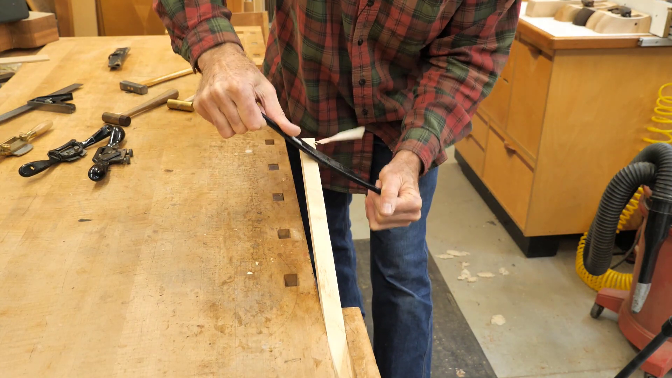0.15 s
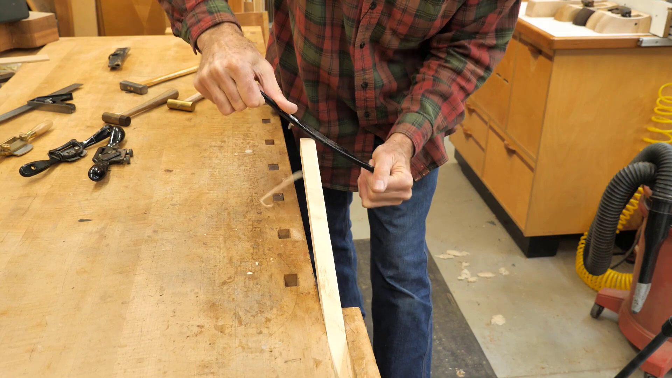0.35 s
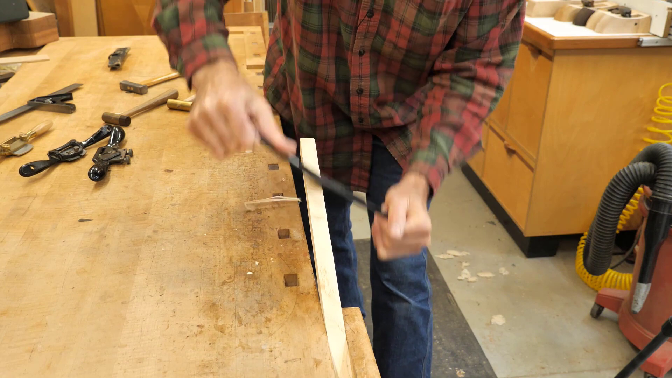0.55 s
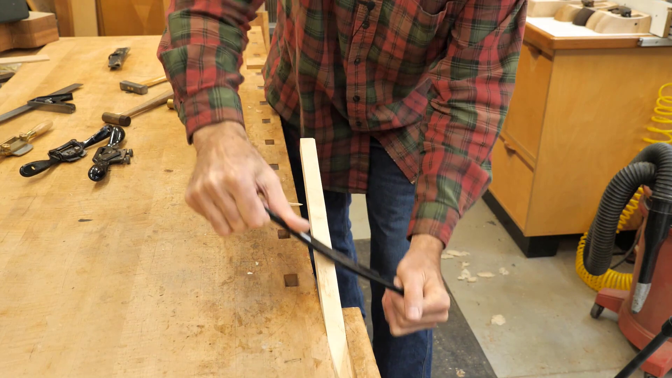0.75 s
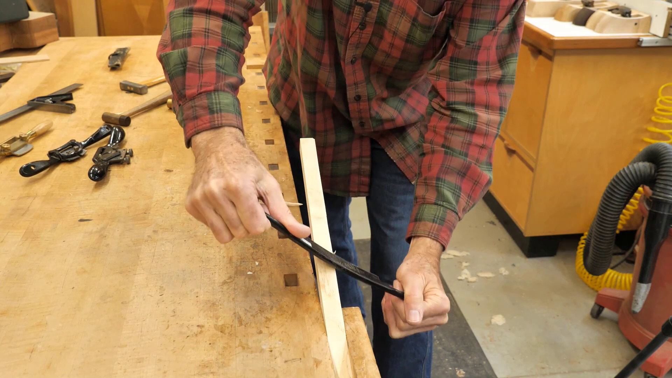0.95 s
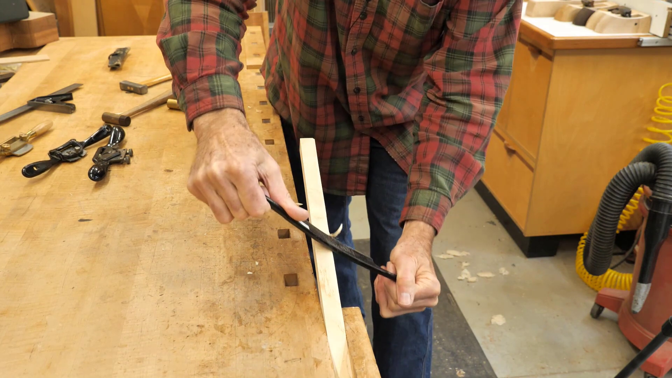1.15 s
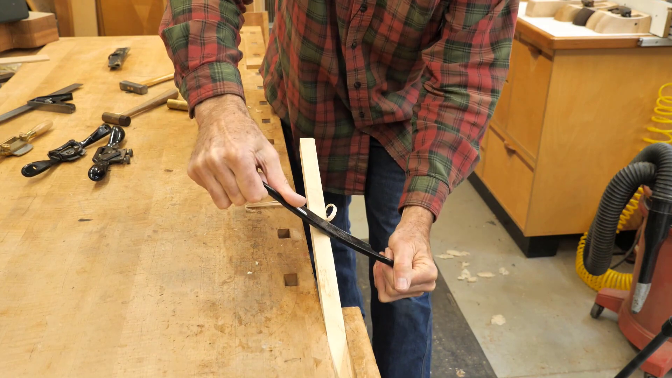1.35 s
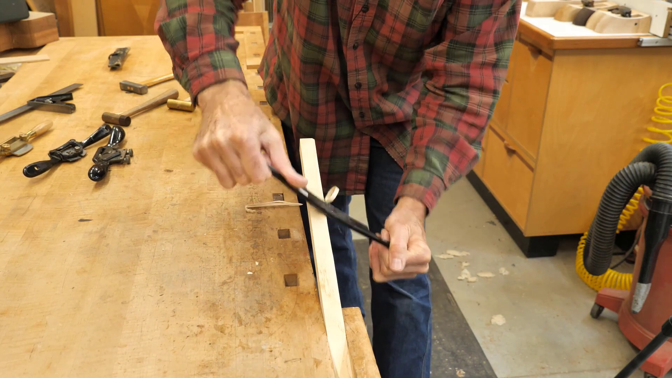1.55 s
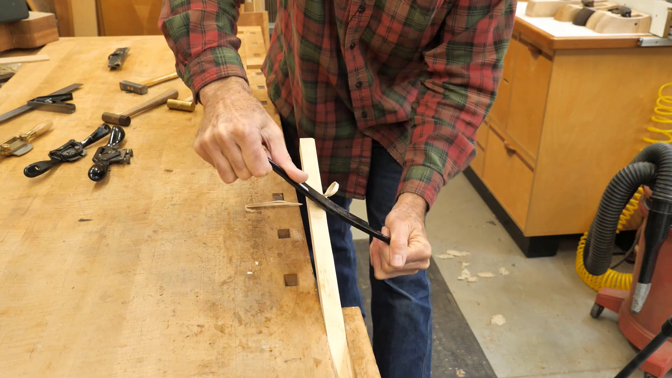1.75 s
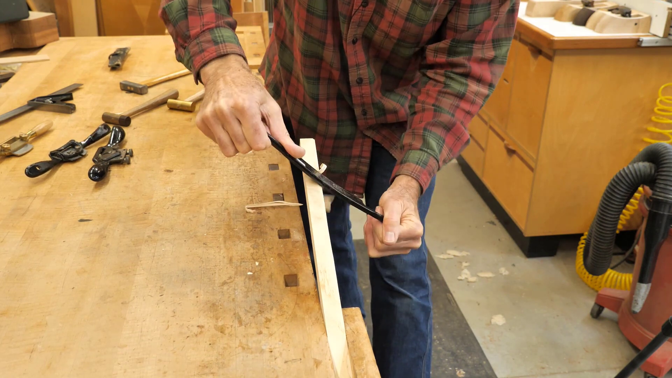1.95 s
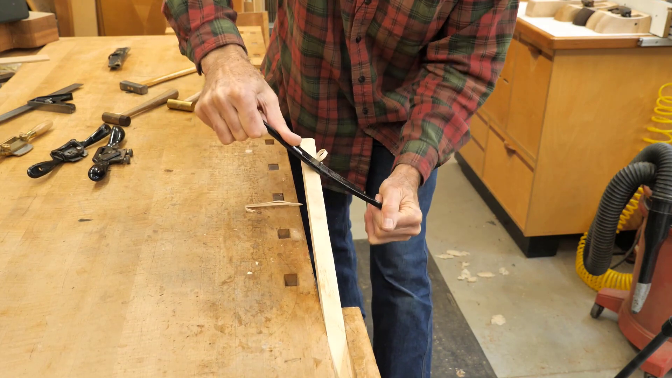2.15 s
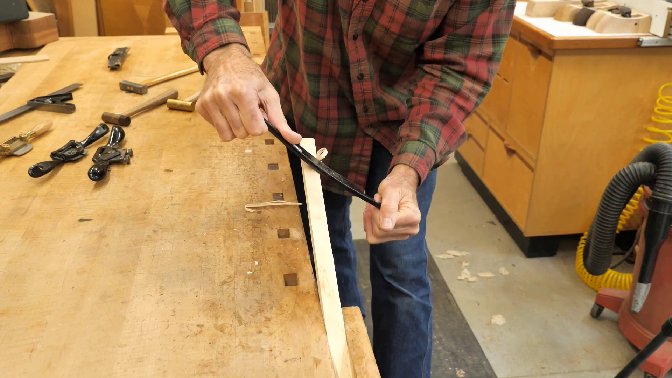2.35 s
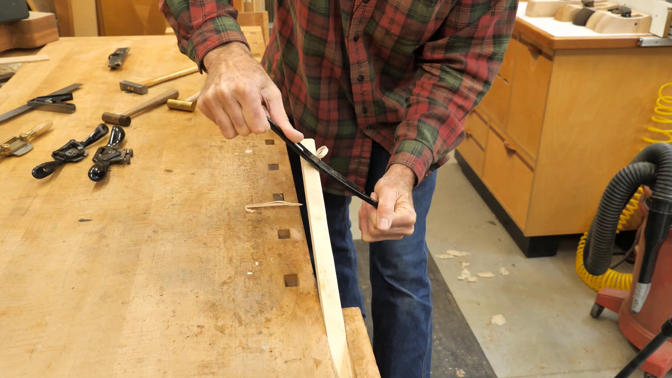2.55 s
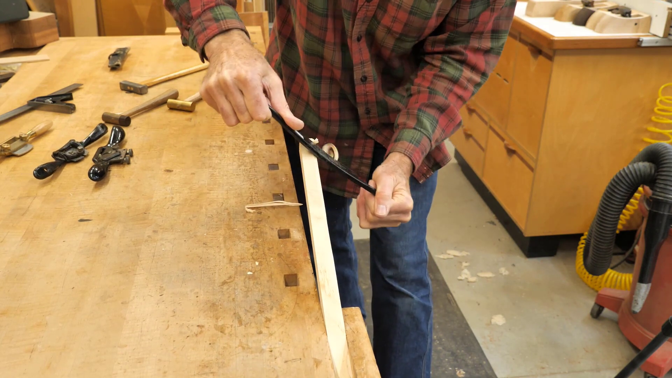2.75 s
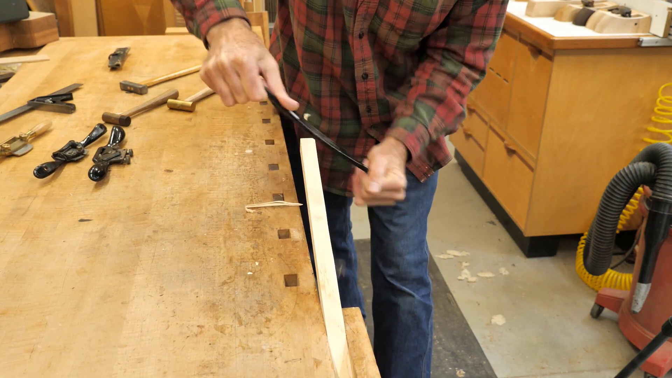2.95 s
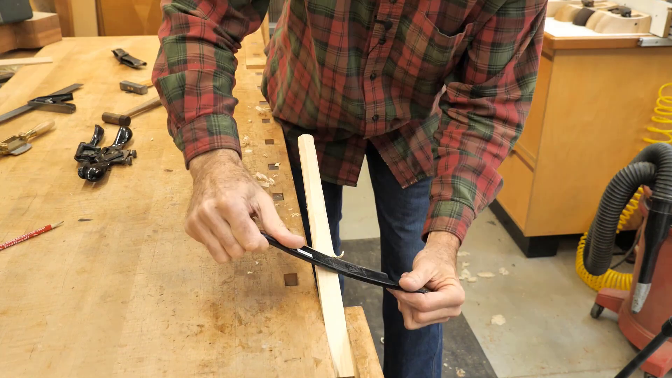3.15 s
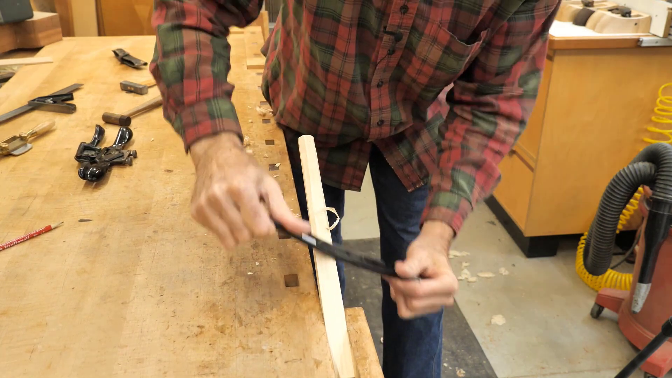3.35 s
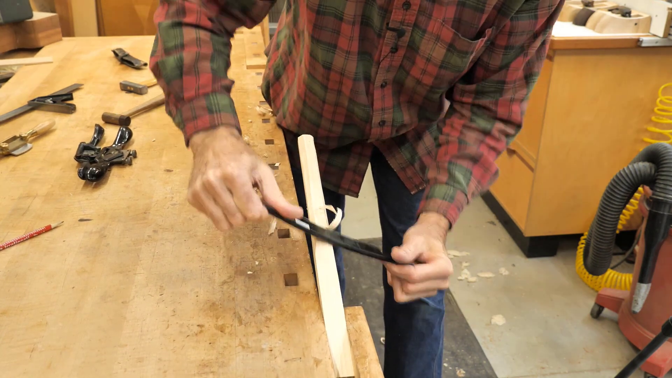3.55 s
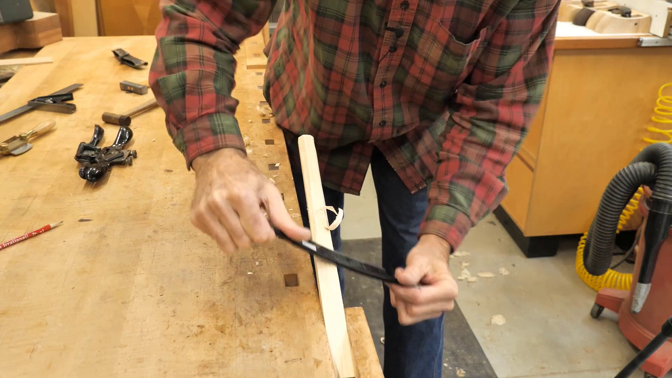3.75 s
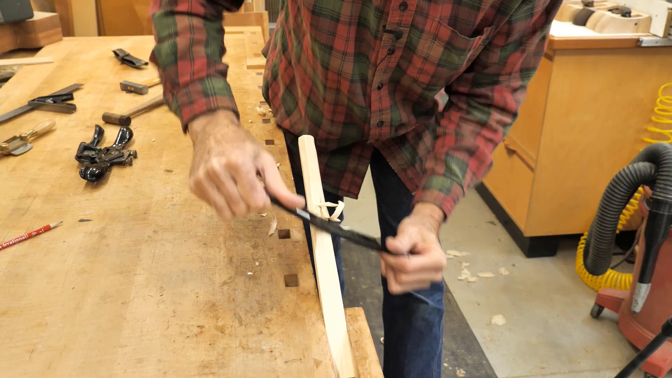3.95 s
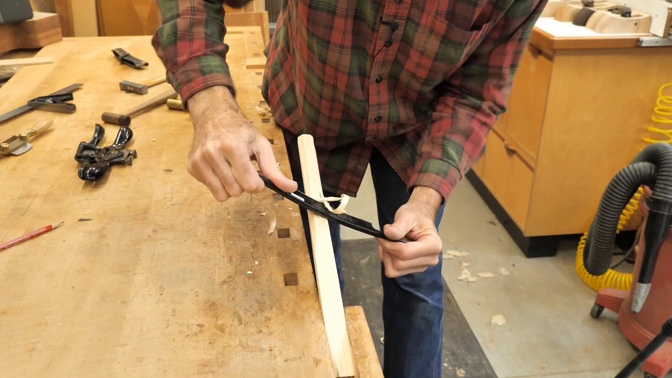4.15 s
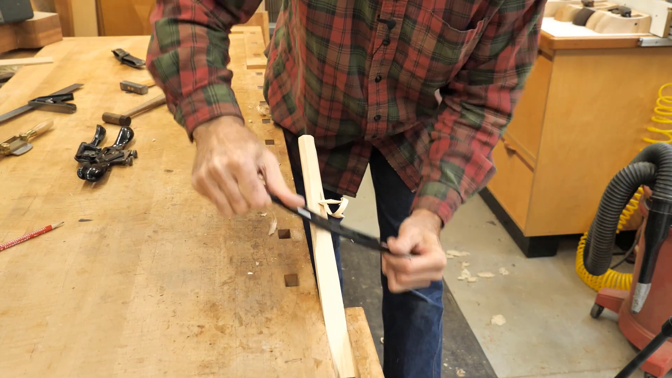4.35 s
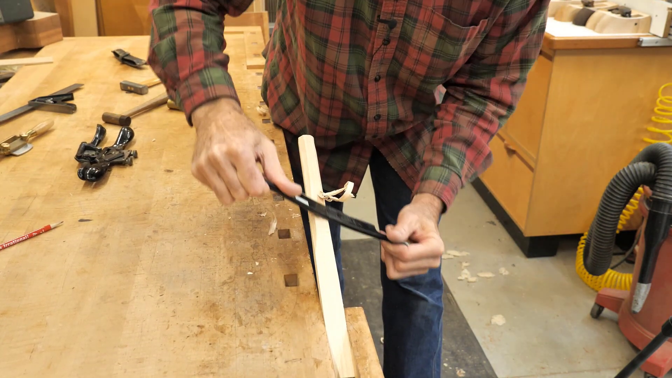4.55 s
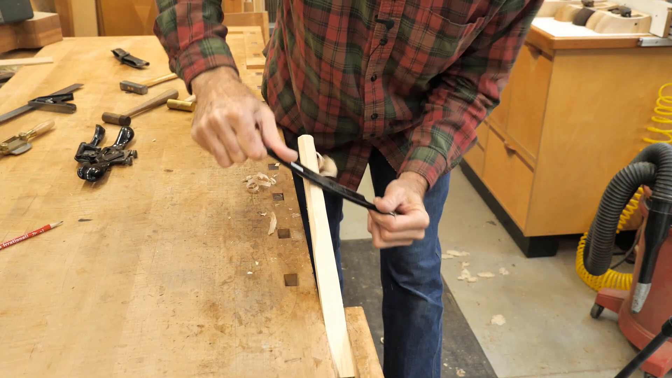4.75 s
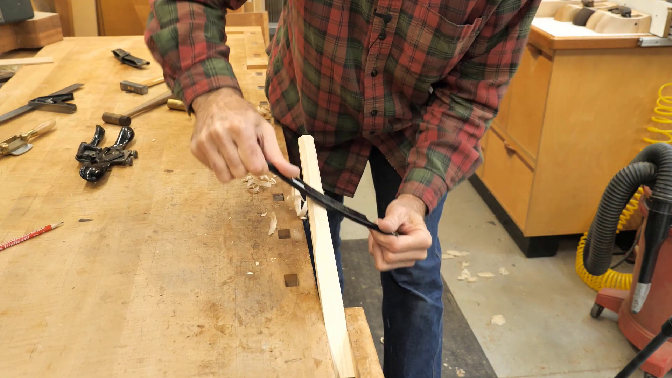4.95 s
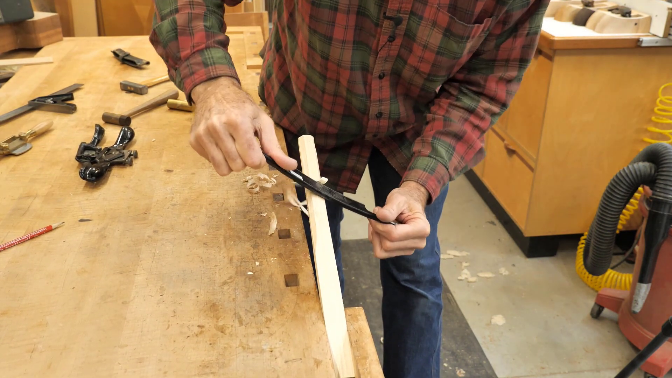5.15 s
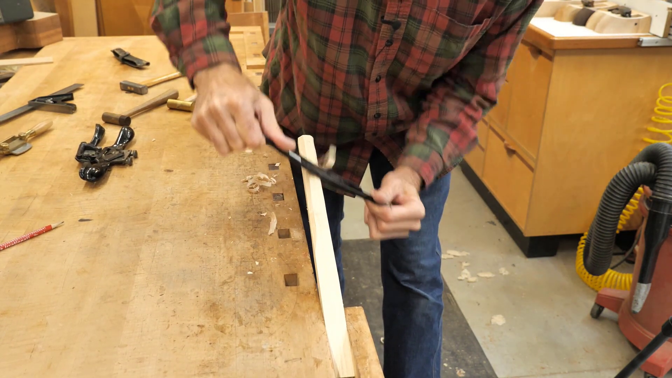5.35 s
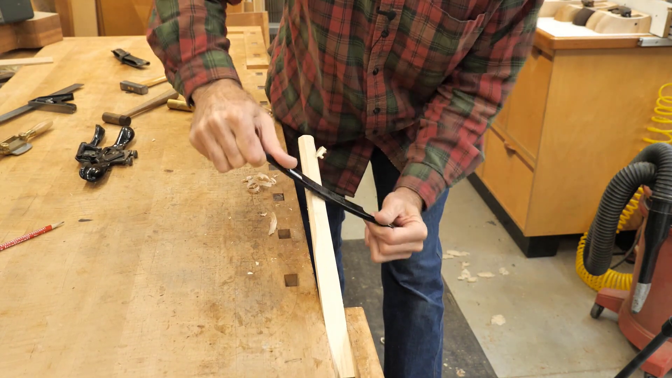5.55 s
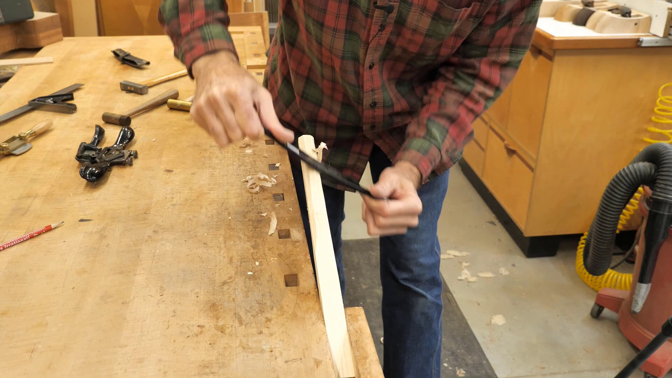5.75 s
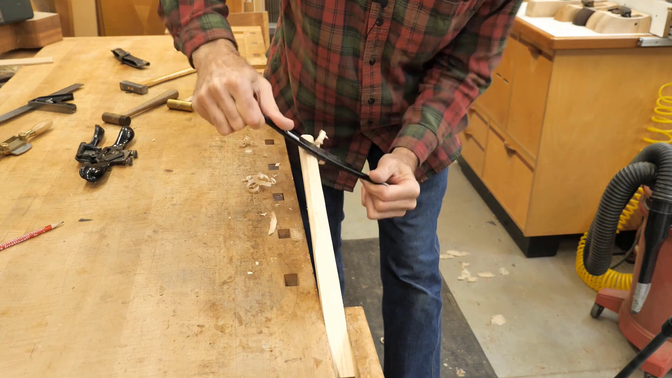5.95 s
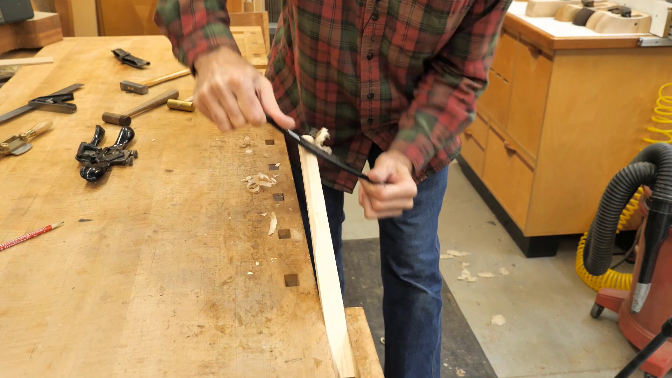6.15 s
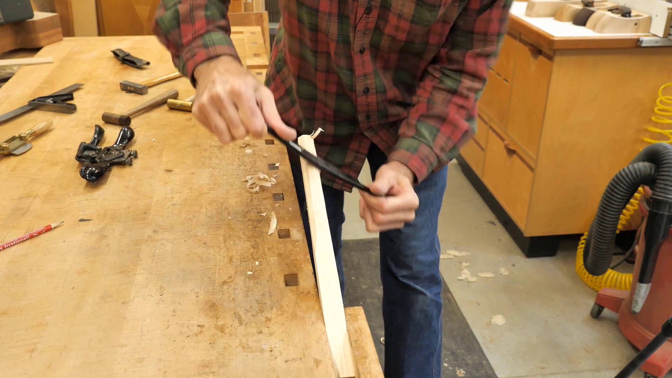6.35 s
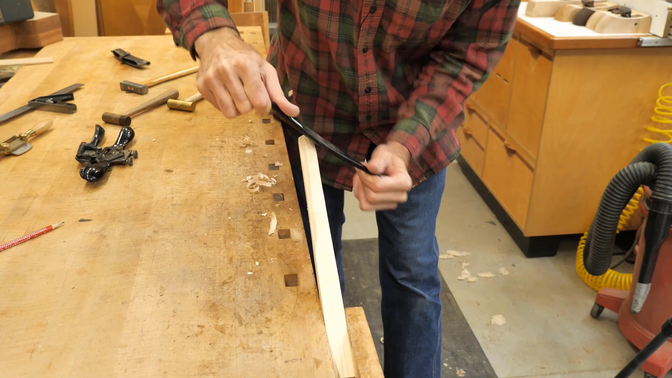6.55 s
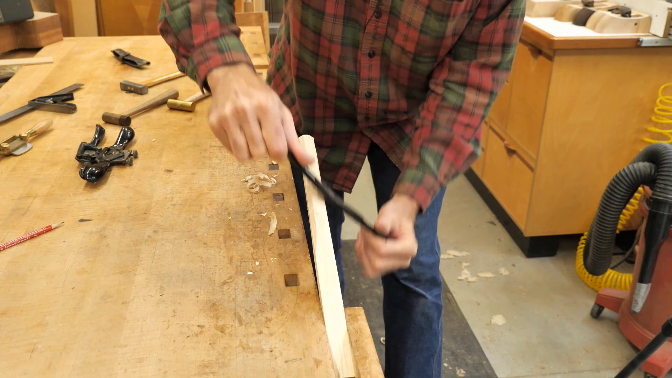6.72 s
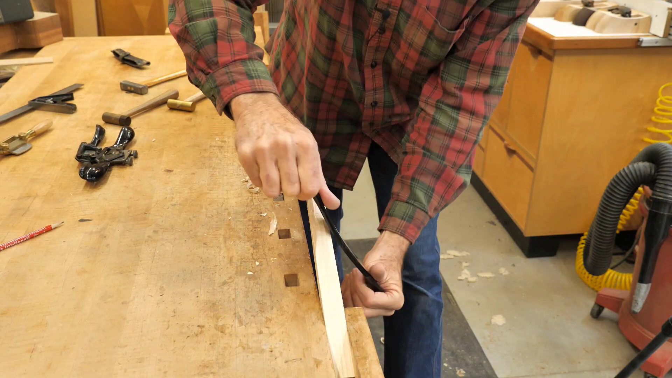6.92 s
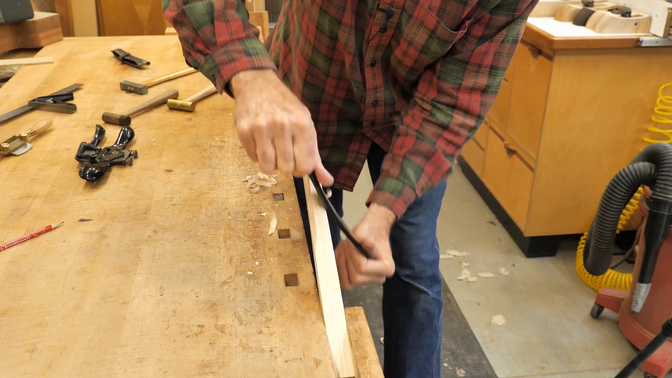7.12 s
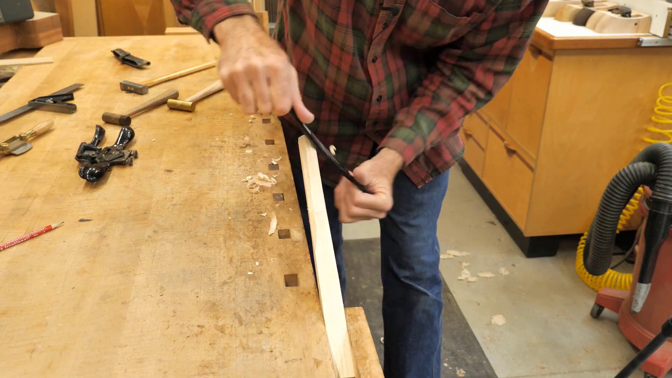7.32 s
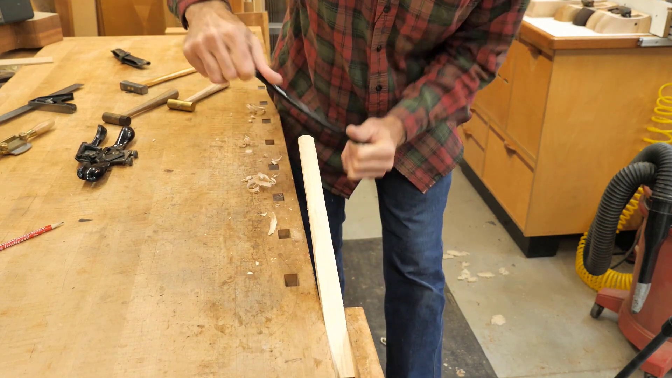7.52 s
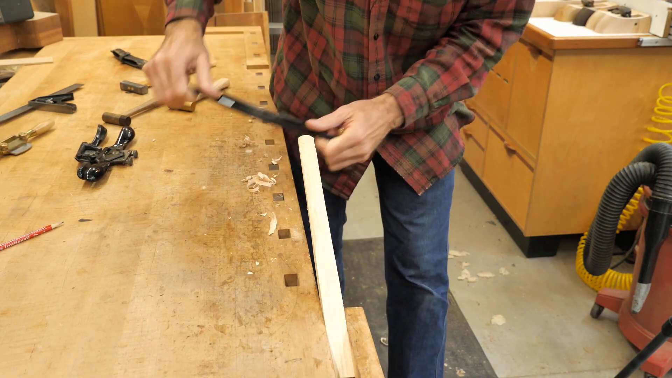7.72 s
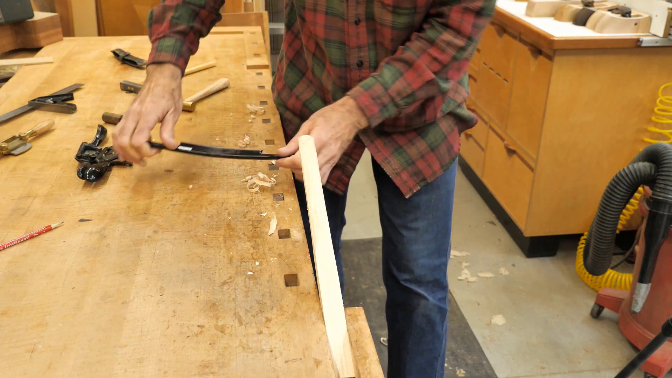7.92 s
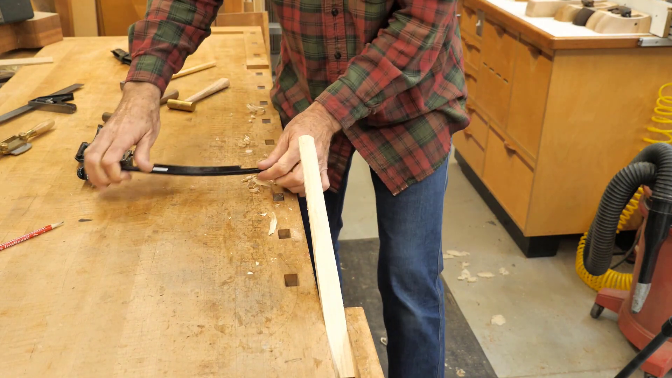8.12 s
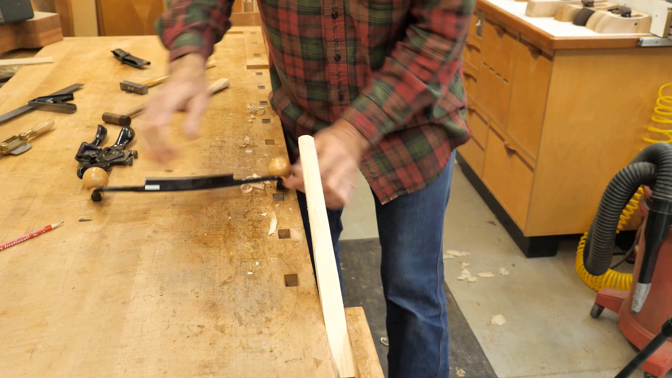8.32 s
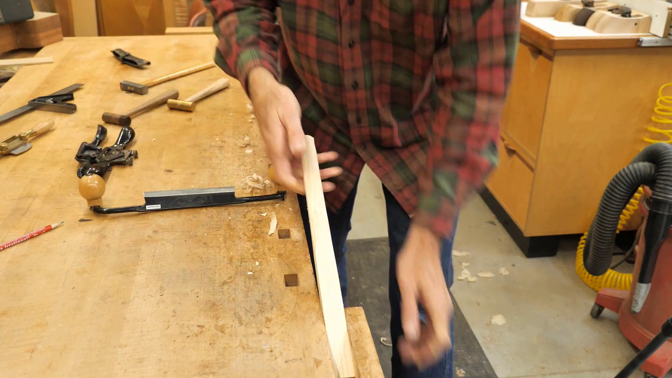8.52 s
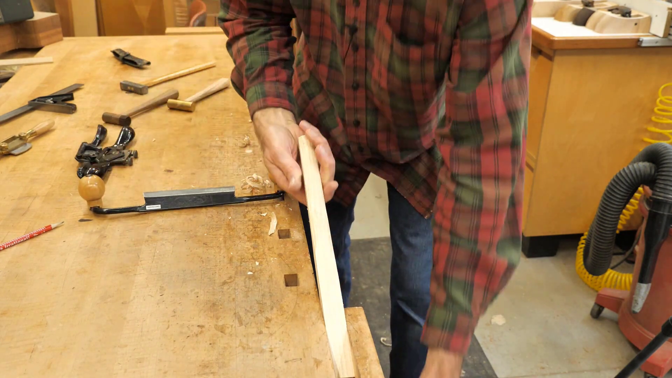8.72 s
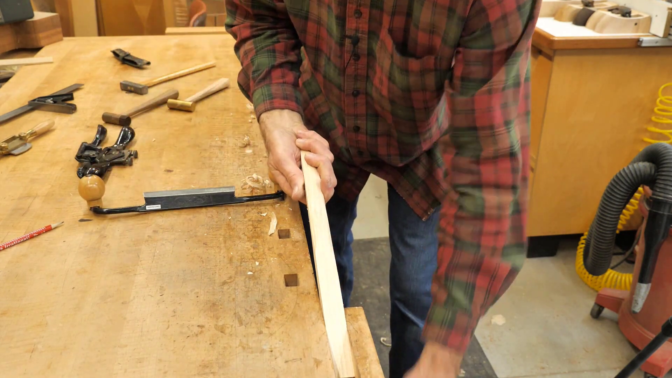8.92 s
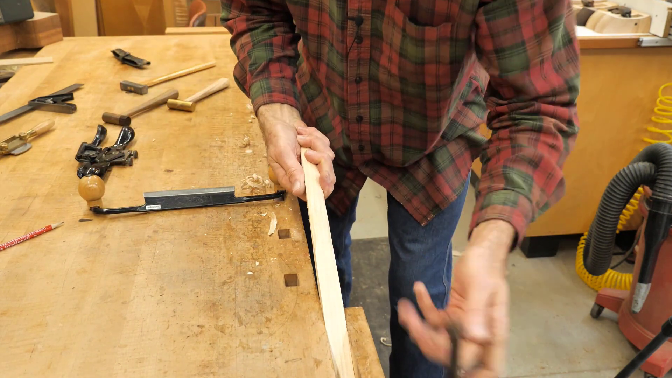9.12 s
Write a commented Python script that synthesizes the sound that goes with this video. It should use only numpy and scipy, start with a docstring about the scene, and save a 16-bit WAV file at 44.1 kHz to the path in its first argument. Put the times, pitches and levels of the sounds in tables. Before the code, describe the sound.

A drawknife pares a clamped wooden blank in short rasping, crackling strokes that grow louder, then it clatters onto the bench and a vise clanks.

```python
"""A drawknife pares a wooden blank in a bench vise: filtered random fractures rasp, fizz and drone.
Noise and a low resonance make the bench shudder; splinters snap as short bursts of noise.
Blade strikes send falling bending waves through the blank and ring its modes.
At last the knife is dropped rattling on the bench top and the vise clanks, as damped sines and noise.
Still air, a hiss that rises near the end and workshop echoes surround it at one close microphone."""
import sys
import numpy as np
from scipy import signal
from scipy.fft import rfft, irfft, next_fast_len
from scipy.io import wavfile
from scipy.ndimage import uniform_filter1d

SR = 44100
rng = np.random.default_rng(int(sys.argv[2]) if len(sys.argv) > 2 else 0)


def master(y):
    """Save y as 16-bit WAV."""
    cut = np.clip(np.atleast_2d(y).T, -1, 1)
    pcm = np.round(cut * 32767)  # scale
    wavfile.write(sys.argv[1], SR, pcm.astype(np.int16))


N = 404838
TIME = np.arange(N) / SR

# pulls of the knife: start t/s, time to bite t/s, time in the cut t/s, then relative levels:
# rasp of fibres level/dB, fizz of the shaving level/dB, drone of the blank level/dB, shudder of the bench level/dB
PULLS = [(0.019, 0.037, 0.045, -45, -56.5, -53, -45.5), (0.257, 0.071, 0.0067, -31.5, -49.5, -33.5, -39),
         (.64, 0.0069, 0.035, -54, -59, -36, -40), (.77, 0.011, 0.065, -52, -83, -48, -41.5),
         (.97, 0.096, 0.091, -46, -62, -44, -45.5), (1.13, 0.053, 0.22, -45, -58, -40.5, -45),
         (1.537, 0.013, 0.11, -37.5, -52.5, -35.5, -37), (1.8, 0.087, 0.054, -39.5, -48.5, -41, -40),
         (2.124, 0.031, 0.054, -40, -53.5, -42.5, -42.5), (2.381, 0.016, 0.07, -49.5, -51.5, -49, -48.5),
         (2.662, 0.049, 0.074, -38, -50.5, -37.5, -41), (2.946, 0.013, 0.0068, -39, -52, -34, -46),
         (3.105, .016, 0.072, -38.5, -47.5, -28, -35), (3.218, 0.046, 0.052, -32, -38.5, -24, -37),
         (3.528, 0.029, 0.066, -31.5, -37, -20.5, -49), (3.68, .03, 0.02, -59.5, -55, -37, -58),
         (3.801, 0.083, 0.028, -22.5, -39, -25.5, -27), (4.138, .035, 0.0084, -21, -32, -22.5, -24.5),
         (4.28, 0.021, 0.018, -45, -39, -29.5, -27.5), (4.345, 0.016, 0.0075, -37, -37.5, -38, -43),
         (4.448, 0.012, 0.028, -36, -35, -26.5, -28), (4.57, 0.022, 0.017, -41.5, -40.5, -37, -36),
         (4.635, 0.021, 0.014, -37, -37.5, -38, -53), (4.718, 0.025, 0.035, -25, -35, -30, -28),
         (4.871, 0.024, 0.0067, -117, -78, -31.5, -55), (5.001, 0.025, 0.083, -35.5, -52, -35.5, -38.5),
         (5.169, 0.013, 0.044, -68, -64, -35.5, -53), (5.363, 0.013, 0.058, -29.5, -39, -24.5, -32.5),
         (5.631, 0.037, 0.071, -25.5, -38.5, -26.5, -30), (5.912, 0.063, 0.0092, -22.5, -35, -23.5, -26.5),
         (6.15, 0.093, 0.0068, -25, -30, -24.5, -28), (6.33, 0.044, 0.015, -74, -107, -41, -43),
         (6.411, 0.04, 0.048, -27.5, -48, -34.5, -36), (6.775, 0.013, 0.0041, -43, -46, -38, -46),
         (6.811, .02, 0.039, -56, -63, -45, -40.5), (7.058, .09, 0.095, -38.5, -53.5, -38.5, -40),
         (7.28, 0.019, 0.055, -73, -65, -41, -41), (7.504, 0.0087, 0.022, -43, -54, -54, -44),
         (7.805, 0.011, 0.01, -52, -54, -71, -70)]
# spectrum of tearing fibres in a deep cut: f/Hz, level/dB
DEEP_RASP = [(800, -11.5), (1400, -2.5), (2200, -5.5), (3300, -1), (4900, -12.5), (5500, -23.5),
             (11000, -29)]
# spectra of a snapping splinter, its bright top and its lower crack: f/Hz, level/dB
SNAP_TOP = [(6000, -25.5), (10500, 4.5), (13000, 18), (15300, 21), (16500, -17)]
SNAP_CRACK = [(900, -51.5), (2500, 4), (4500, 24), (7500, 23), (10000, 20), (12500, 9), (16000, -20)]
# modes of the bench top: f/Hz, relative level/dB, t60 t/s
BENCH_MODES = [(96, -5, .34), (142, -7, .28), (339, -9, .16), (401, -1, .19), (505, -1, .16),
               (565, -1, .18), (642, -8, .16), (785, -5, .16), (828, -6, .2), (982, -6, .17),
               (1004, -6, .17), (1265, -5, .2), (1451, -5, .2), (1822, -10, .16)]


def amp(db):
    """Decibels to gain."""
    return 10 ** (np.asarray(db) / 20)


def evened(x):
    """Scales to rms 1."""
    return x / np.sqrt(np.mean(x ** 2) + 1e-20)


def peaked(x, size=176):
    """Scales a hit so that its loudest stretch of `size` samples (4 ms) has rms 1."""
    return x / np.sqrt(uniform_filter1d(x ** 2, size).max() + 1e-20)


def read(points, hz):
    """Reads a table along a logarithmic frequency axis."""
    f, value = np.transpose(points)
    return np.interp(np.log(hz + 1), np.log(f + 1), value)


def gains(rows):
    """One gain curve over time for each dB column of a table."""
    s, *columns = np.transpose(rows)
    return [amp(np.interp(TIME, s, c)) for c in columns]


def add(mix, s, sound):
    """Mixes a sound in at a time in seconds."""
    part = mix[max(round(s * SR), 0):][:len(sound)]
    part += sound[:len(part)]


def colour(x, spectrum, size=8192):
    """Causal minimum-phase filter with the given spectrum, falling 24 dB per octave beyond its ends."""
    hz = np.abs(np.fft.fftfreq(size, 1 / SR)) + 1
    octaves_out = np.abs(np.log2(hz / np.clip(hz, spectrum[0][0], spectrum[-1][0])))
    level_db = np.maximum(read(spectrum, hz) - 24 * octaves_out, -100)
    log_gain = np.log(amp(level_db))
    response = np.exp(np.conj(signal.hilbert(log_gain)))
    taps = np.fft.ifft(response).real[:size // 2]
    return signal.oaconvolve(x, taps)[:len(x)]


def ring(modes):
    """A struck object: a sum of dying sines."""
    t = TIME[:SR // 2]
    return sum(amp(db) * np.exp(-np.log(1000) * t / t60) * np.sin(2 * np.pi * hz * t)
               for hz, db, t60 in modes)


def dying(t60s):
    """Countless overlapping modes or echoes: noise whose bands each fade at their own speed."""
    hz, t, z = signal.stft(rng.standard_normal(SR // 2), SR, nperseg=256)
    decay = np.exp(-np.log(1000) * t / read(t60s, hz)[:, None])
    return signal.istft(z * decay, SR, nperseg=256)[1][:SR // 2]


def wander(hz):
    """Slow random drift with rms 1, rolling off above the given frequency."""
    size = next_fast_len(N)
    rolloff = 1 + (np.fft.rfftfreq(size, 1 / SR) / hz) ** 4
    return evened(irfft(rfft(rng.standard_normal(size)) / rolloff, size)[:N])


def fibres(per_s, spread_db):
    """Tiny fractures at random moments, of uneven strength and either sign."""
    size = amp(spread_db * np.minimum(rng.exponential(1, N), 4))
    return size * rng.choice([-1, 1], N) * (rng.random(N) < per_s / SR)


def resonate(x, hz, width):
    """Shifts hz (fixed or moving) down to zero, smooths, and shifts back: a resonance of gain 1."""
    turn = np.exp(2j * np.pi * np.cumsum(hz * np.ones(N)) / SR)
    r = np.exp(-np.pi * width / SR)
    return 2 * (turn * signal.lfilter([1 - r], [1, -r], x / turn)).real


def patchy(x, patch_db):
    """Uneven grain in the wood: narrow bands swell and fade for a few hundredths of a second."""
    z = signal.stft(x, SR, nperseg=512, noverlap=384)[2]
    across_bands = uniform_filter1d(rng.standard_normal(z.shape), size=4, axis=0)
    patches = evened(uniform_filter1d(across_bands, size=10, axis=1))
    return evened(signal.istft(z * amp(patch_db * patches), SR, nperseg=512, noverlap=384)[1][:N])


def background():
    """Still workshop air and a soft hiss that rises near the end, both filtered noise."""
    # spectrum of the air: f/Hz, level/dB
    air_spectrum = [(15, -44), (25, 1), (97, 1), (200, -10), (463, -7), (887, -23.5), (2840, -23),
                    (3620, -42.5), (13200, -32), (14800, -36), (16000, -71)]
    # spectrum of the hiss: f/Hz, level/dB
    hiss_spectrum = [(300, 1), (1200, -11), (1500, -12), (2800, -16), (4500, -8), (7000, -13.5),
                     (12700, -18), (16000, -26)]
    # rising hiss: t/s, level/dB
    hiss_levels = [(7.55, -72), (7.9, -53.5), (8.2, -50.5), (8.7, -53.5), (9.18, -53)]
    air, hiss = rng.standard_normal((2, N))
    still_air = amp(-55.5) * evened(colour(air, air_spectrum))
    return still_air + gains(hiss_levels)[0] * evened(colour(hiss, hiss_spectrum))


def pulls(levels_db, resting, swell, release, linger_db, linger):
    """Each pull swells as the edge bites, holds, and drops as it slips out into a slowly fading slide.

    release and linger are time constants in seconds.
    """
    out, t = resting.copy(), TIME[:SR]
    for (start, rise, hold, *_), db in zip(PULLS, levels_db):
        after = np.maximum(t - rise - hold, 0)
        slip = (1 - amp(linger_db)) * np.exp(-after / release)
        slide = amp(linger_db) * np.exp(-after / linger)
        add(out, start, amp(db) * np.minimum(t / rise, 1) ** swell * (slip + slide))
    return out


def rasping(level, grip):
    """Tearing fibres sound the blade and the shaving; a thicker shaving rasps louder and lower."""
    # spectrum of tearing fibres in a light cut: f/Hz, level/dB
    light_rasp = [(800, -14.5), (1400, -8.5), (2200, -7.5), (3000, -0.5), (3700, -7.5), (6000, -8),
                  (11000, -23.5)]
    # resonances of blade and shaving: f/Hz, width f/Hz, light cut level/dB, deep cut level/dB
    rasp_peaks = [(1373, 370, 3.5, -44), (1960, 48, -4, -2), (2210, 560, -23, 11), (2850, 63, -10.5, -4),
                  (3075, 32, -2, 9), (3630, 127, -9, 6.5), (4810, 280, -36, 19), (5840, 190, -5, -24)]
    # moving main resonance of the shavings: t/s, f/Hz
    shaving_pitch = [(.4, 1420), (1.05, 2660), (2.3, 2830), (2.7, 1320), (3.25, 2220), (3.87, 3560),
                     (4.2, 1740), (4.76, 1670), (5.05, 3270), (5.4, 2360), (6.44, 2400), (6.5, 1770),
                     (7.1, 2630)]
    tears = grip * fibres(per_s=4000, spread_db=3.4)
    light, deep = colour(tears, light_rasp), colour(tears, DEEP_RASP)
    light_ring, deep_ring = np.zeros((2, N))
    for hz, width, light_db, deep_db in rasp_peaks:
        mode = signal.iirpeak(hz, hz / width, fs=SR)
        light_ring += amp(light_db) * signal.lfilter(*mode, light)
        deep_ring += amp(deep_db) * signal.lfilter(*mode, deep)
    depth = level / (level + amp(-34))  # louder rasp crossfades to the deep cut
    edge = (1 - depth) * evened(light + light_ring) + depth * evened(deep + deep_ring)
    shaving_hz = np.interp(TIME, *np.transpose(shaving_pitch))
    edge = edge + amp(3) * resonate(edge, shaving_hz, width=280)
    return level * patchy(edge, patch_db=3.8)


def splinters(fizz, follow=0.67, top_db=-30, crack_db=-33):
    """Small splinters tick off at random, louder while a shaving curls."""
    ticks = fibres(per_s=60, spread_db=4)
    top = amp(top_db) * evened(colour(ticks, SNAP_TOP))
    crack = amp(crack_db) * evened(colour(ticks, SNAP_CRACK))
    return fizz ** follow * (top + crack)


def cutting():
    """The edge catches and slips; breaking fibres rasp, fizz and shake the blank and the bench."""
    # how hard the worker bears on the blank, keeping it trembling between pulls: t/s, relative level/dB
    lean_levels = [(0, -28), (2.55, -11.5), (3.1, -1.5), (3.35, 5), (4.4, 7.5), (5.45, 2), (5.65, -8.5),
                   (6.4, -3), (6.7, -7), (7.05, -13), (7.4, -7.5), (7.7, -16)]
    # spectrum of the curling shaving: f/Hz, level/dB
    fizz_spectrum = [(4000, 0), (7000, -7), (10000, -7.5), (12500, -7), (15300, -10.5), (16000, -12)]
    # spectrum of the droning blank: f/Hz, level/dB
    drone_spectrum = [(180, -56), (280, -1), (400, -4.5), (490, -1.5), (590, -5.5), (700, -10),
                      (950, -12.5), (1400, -17.5), (2300, -19.5), (5000, -32)]
    # spectrum of the shuddering bench: f/Hz, level/dB
    shudder_spectrum = [(25, -12), (55, -9), (95, -0.5), (120, -4.5), (165, -0.5), (210, -2.5), (290, -8.5),
                        (380, -11.5)]
    rasp_db, fizz_db, drone_db, shudder_db = np.transpose(PULLS)[3:]
    lean = gains(lean_levels)[0]
    rocking = lean * evened(amp(4 * wander(hz=27)))  # the resting knife rocks unevenly on the blank
    rasp = pulls(rasp_db, amp(-55.5) * lean, swell=1.85, release=0.01, linger_db=-12, linger=0.07)
    fizz = pulls(fizz_db, amp(-66.5) * lean, swell=2.9, release=0.012, linger_db=-21, linger=0.15)
    drone = pulls(drone_db, amp(-41) * rocking, swell=2.5, release=0.026, linger_db=-15, linger=0.085)
    shudder = pulls(shudder_db, amp(-41.5) * rocking, swell=4.4, release=0.02, linger_db=-19.5, linger=0.11)
    # sudden changes of bite reach the blank and the bench too
    usual_rasp = np.exp(uniform_filter1d(np.log(rasp), size=6000))
    jerk = (rasp / usual_rasp) ** 0.079
    # the edge grips unevenly: slow catches and quick slips
    grip = evened(amp(2.3 * wander(hz=47) + 2 * wander(hz=240)))
    edge = amp(-0.75) * rasping(rasp, grip)
    crackle = colour(grip * fibres(per_s=3500, spread_db=-2.5), fizz_spectrum)
    curl = amp(2.5) * fizz * patchy(crackle, patch_db=4.2)
    drag = colour(grip * fibres(per_s=4000, spread_db=1.5), drone_spectrum)
    # share of free ringing in the blank's drone, changing over time
    free = np.interp(TIME, [.4, 1, 1.6, 2, 3, 3.6, 4.2], [.2, 1, 1, .2, .7, .8, .1])
    sung = evened(drag + amp(12) * resonate(drag, hz=500, width=80))
    drag = (1 - free) * evened(drag) + free * sung
    blank = amp(-2) * drone * patchy(drag, patch_db=2)
    shaking = colour(rng.standard_normal(N), shudder_spectrum)
    boom = amp(5) * resonate(shaking, BENCH_MODES[0][0], width=7)  # the lowest bench mode
    bench = amp(0.82) * shudder * evened(shaking + boom)
    return edge + curl + splinters(fizz) + jerk * (blank + bench)


def snaps(rise=0.0002, fade=0.001, crumble_db=-17, crumble=0.006):
    """A splinter lets go with one sharp crack and a brief crumbling tail of noise (times in s)."""
    # snapping splinters: t/s, relative level/dB, lower crack against the top level/dB
    snap_times = [(0.3196, -19.5, -2.5), (1.178, -30, -1), (1.2092, -20, -17), (1.58, -18, -28),
                  (1.648, -18, -6), (1.8596, -12, -28), (2.7222, -20, -31), (3.24, -11, -7),
                  (3.571, -9, -18), (3.88, 7, -30), (3.8826, -4.5, -37), (3.8998, 10.5, -6.5),
                  (4.188, -6, -21), (4.466, -3, -16), (4.6569, -17, 0), (4.7484, -2.5, -11),
                  (4.777, -5, -18), (4.9042, -13, 2), (5.3887, -2, -32), (5.449, -18.5, 2),
                  (5.7224, -13, -17), (5.744, -9, -15), (5.9766, -9, -32), (6.2341, 6.5, -12),
                  (6.2497, -14, -5), (6.354, -26.5, 8), (6.786, -21.5, 1), (7.797, -32.5, 1)]
    out, t = np.zeros(N), TIME[:SR // 20]
    for s, db, crack_db in snap_times:
        fall = np.exp(-t / fade) + amp(crumble_db) * np.exp(-t / crumble)
        burst = rng.standard_normal(len(t)) * (1 - np.exp(-t / rise)) * fall
        top, crack = peaked(colour(burst, SNAP_TOP)), peaked(colour(burst, SNAP_CRACK))
        add(out, s - 0.0005, amp(db - 18) * (top + amp(crack_db + 5) * crack))
    return out


def bites(sweep_hz=2600, sweep=0.005696, fade=0.016, crunch_fade=0.0039, round_trip=0.0021):
    """A blow is a bending wave, treble first, bouncing between the ends of the ringing blank (times in s)."""
    # the blade strikes the blank: t/s, then relative levels: ring level/dB, tick of the edge level/dB,
    # thump of the bench level/dB; ring pitch f/Hz
    strikes = [(0.648, -24, -32.5, -18, 493), (0.664, -25.5, -35.5, -36, 912),
               (0.773, -13.5, -23, -62, 529), (1.552, -23, -65, -42, 511), (2.112, -36, -77, -12, 447),
               (2.363, -29, -50, -73, 454), (2.67, -26.5, -47, -24, 461), (2.956, -31.5, -32, -41, 632),
               (3.004, -23, -33, -14, 546), (3.116, -18.5, -56, -44, 482), (3.238, -19.5, -26.5, -23, 395),
               (3.289, -11, -30.5, -48, 419), (3.476, -10.5, -28, -15, 483), (3.728, -20, -42, -11, 456),
               (3.881, -19, -17, -11, 450), (4.03, -26, -29, -24, 553), (4.175, -11.5, -14.5, -37, 510),
               (4.463, -11.5, -12.5, -14, 497), (4.745, -21.5, -39, -3, 493), (5.38, -9, -24, -22, 509),
               (5.66, -16.5, -28.5, -38, 422), (6.096, -31, -31, -42, 492), (6.354, -23.5, -66, -6, 518),
               (6.492, -23, -45, -41, 594), (6.822, -29, -38, -24, 537), (6.824, -27, -45, -48, 998),
               (7.302, -25, -43, -49, 369), (7.515, -65, -31.5, -41, 577)]
    # modes of the blank: multiple of the ring pitch, relative level/dB, t60 t/s
    blank_modes = [(0.798, -6.5, 0.16), (1.002, 9, 0.077), (1.13, -13, 0.14), (1.85, -10, 0.068),
                   (2.9, -17, 0.078)]
    out, t = np.zeros(N), TIME[:SR // 2]
    for s, ring_db, tick_db, thump_db, pitch in strikes:
        hz = 70 + sweep_hz / (1 + t / (sweep * rng.uniform(0.774, 1.24))) ** 2
        # thump, ring and tick set the wave's level as it falls through their ranges
        balance = [(150, thump_db + 7.5), (600, ring_db - 15.5), (1600, tick_db - 0.5)]
        strength = amp(read(balance, hz))
        wave = strength * np.sin(2 * np.pi * np.cumsum(hz) / SR) * np.exp(-(t / fade) ** 2)
        for k in range(5):
            add(out, s + k * round_trip * rng.uniform(0.9, 1.1), 0.6 ** k * wave)
        crunch = colour(rng.standard_normal(len(t)) * np.exp(-t / crunch_fade), DEEP_RASP)
        modes = [(k * pitch, db, t60) for k, db, t60 in blank_modes]
        body = ring(modes) * (1 - np.exp(-t / 0.0028))  # soft onset
        add(out, s, amp(ring_db - 8.5) * peaked(body) + amp(tick_db - 13) * peaked(crunch))
    return out


def bench_blows(chatter_db=-8, gap=0.011, click_fade=0.0028, let_go=8.4):
    """Handles and blade land and chatter on the bench; the top booms, the steel clicks and sings (times in s)."""
    # blows: t/s, then relative levels: dull thud level/dB, hard clack level/dB, ring of the blade level/dB;
    # rattle length t/s
    blows = [(8.184, -21, -29, -62, 0.03), (8.267, -12.5, -17, -41, 0.025),
             (8.312, -14.5, -14.5, -42, 0.04), (8.4657, -17, -0.5, -26, 0.01),
             (8.515, -17, -11.5, -67, 0.058), (8.567, -19, -13, -63, 0.047),
             (8.624, -22.5, -17.5, -65, 0.068), (8.716, -55, -50, -50.5, 0.014)]
    # modes of the blade: f/Hz, relative level/dB, t60 t/s
    blade_modes = [(4231, -1, .16), (5835, -3, .15), (7500, -11, .14), (5496, 0, .28)]
    # spectrum of the dull thud: f/Hz, level/dB
    thud_spectrum = [(75, -14), (92, -4), (250, -9.5), (400, 5), (520, 5.5), (780, -9.5), (1300, -19),
                     (1800, -47)]
    # spectrum of the hard clack: f/Hz, level/dB
    clack_spectrum = [(150, -4), (400, -10), (800, 3.5), (1400, -3.5), (2200, -14), (3200, -16.5),
                      (6000, -31.5), (15000, -41)]
    # decay of the bench: f/Hz, t60 t/s
    bench_t60 = [(90, 0.31), (400, 0.15), (1500, 0.21), (5000, 0.14), (15000, 0.14)]
    out, boom, t = np.zeros(N), peaked(ring(BENCH_MODES)), TIME[:SR // 2]
    for s, thud_db, clack_db, blade_db, length in blows:
        click = peaked(colour(rng.standard_normal(len(t)) * np.exp(-t / click_fade), SNAP_CRACK))
        # the hands damp the blade's last, longest mode until they let go
        steel = peaked(ring(blade_modes if s > let_go else blade_modes[:-1]))
        add(out, s, amp(thud_db - 7) * boom)
        add(out, s, amp(blade_db) * (steel + amp(6.5) * click))
        order = np.arange(8)
        delays = gap * (order + rng.uniform(-0.308, 0.285, len(order)) * (order > 0))
        contacts = np.zeros(SR // 4)
        for k, delay in enumerate(delays):
            strength = amp(chatter_db) * np.exp(-(delay / length) ** 2) if k else 1
            add(contacts, delay, np.array([strength]))
        thud = peaked(colour(dying(bench_t60), thud_spectrum))
        clack = peaked(colour(dying(bench_t60), clack_spectrum))
        hit = amp(thud_db + 4.5) * thud + amp(clack_db - 4.5) * (clack + amp(1) * boom)
        add(out, s, signal.fftconvolve(contacts, hit))
    return out


def vise(fade=0.02):
    """A hand thuds on the vise; its loose handle strikes the stop with a short steel clank (fade in s)."""
    # hand and handle: t/s, muffled thud relative level/dB, clank relative level/dB
    clanks = [(8.88, -16, -31), (8.926, -21.5, -11), (8.935, -26, -25), (9.17, -40, -23)]
    # modes of the vise in the bench: f/Hz, relative level/dB, t60 t/s
    vise_modes = [(93, -14.5, 0.56), (224, 8, 0.077), (268, -1.5, 0.27), (348, 4, 0.069)]
    # modes of the steel handle: f/Hz, relative level/dB, t60 t/s
    handle_modes = [(2230, -7, .03), (4620, -1, .03), (4830, 0, .03), (5150, -5, .03), (6800, -11, .03)]
    # spectrum of the clank: f/Hz, level/dB
    clank_spectrum = [(250, 15), (1100, 11.5), (1800, 3), (2200, 4.5), (3900, 0.5), (4750, 4), (5500, -5),
                      (7000, -10.5), (15000, -28)]
    out, t = np.zeros(N), TIME[:SR // 2]
    thud = peaked(ring(vise_modes) * (1 - np.exp(-(t / 0.0013) ** 2)))
    handle = peaked(ring(handle_modes))
    for s, thud_db, clank_db in clanks:
        clank = peaked(colour(rng.standard_normal(len(t)) * np.exp(-t / fade), clank_spectrum))
        steel = amp(-1.5) * clank + amp(-5) * handle
        add(out, s, amp(thud_db) * thud + amp(clank_db) * steel)
    return out


def room(x, wet_db, early_db):
    """Quick echoes from the bench and the worker, then the workshop's tail."""
    # decay of the workshop: f/Hz, t60 t/s
    room_t60 = [(100, 1), (500, 0.43), (3000, 0.69), (8000, 0.45), (15000, 0.15)]
    tail = dying(room_t60)
    response = np.zeros(SR)
    add(response, 0.009, amp(wet_db) * tail / np.linalg.norm(tail))
    for s in rng.uniform(0.002, 0.018, 8):
        add(response, s, amp([early_db]) * rng.choice([-1, 1]))
    return x + signal.fftconvolve(x, response)[:N]


def scene():
    """Nearly mono: the two channels differ very slightly, mostly in the treble."""
    work = amp(-1) * room(cutting(), wet_db=-18, early_db=-17.5)
    hits = room(snaps(), wet_db=-15.5, early_db=-29) + room(bites(), wet_db=-14, early_db=-18.5)
    tools = room(bench_blows(), wet_db=-17, early_db=-20) + room(vise(), wet_db=-12.5, early_db=-35)
    mono = background() + work + hits + tools
    spread = rng.standard_normal(SR // 50)
    side = signal.oaconvolve(mono, spread / np.linalg.norm(spread))[:N]
    side = colour(side, [(30, -49), (700, -41), (3000, -25.5), (9000, -13.5), (16000, -19)])
    return np.array([mono + side, mono - side])


def record(dry):
    """The loudest peaks are rounded off below 0.7; then a low-pass at 16.1 kHz limits the band."""
    rounded = dry / (1 + (dry / 0.7) ** 4) ** (1 / 4)
    low_pass = signal.firwin(511, 16100, window=("kaiser", 9), fs=SR)
    return signal.oaconvolve(rounded, low_pass[None], "same")


dry = scene()
out = record(dry)
master(out)
```